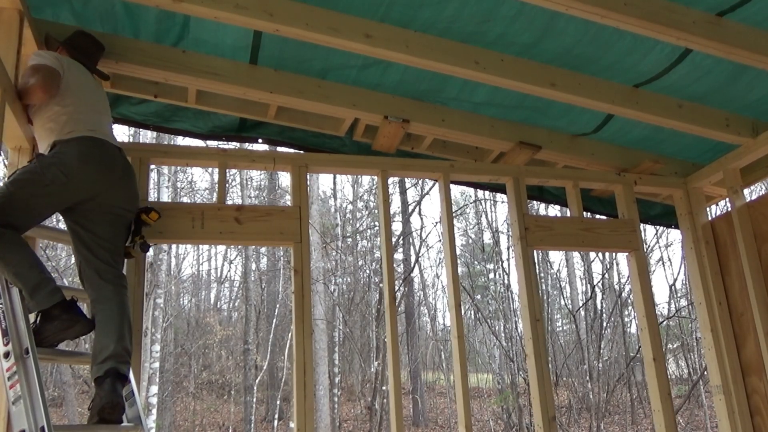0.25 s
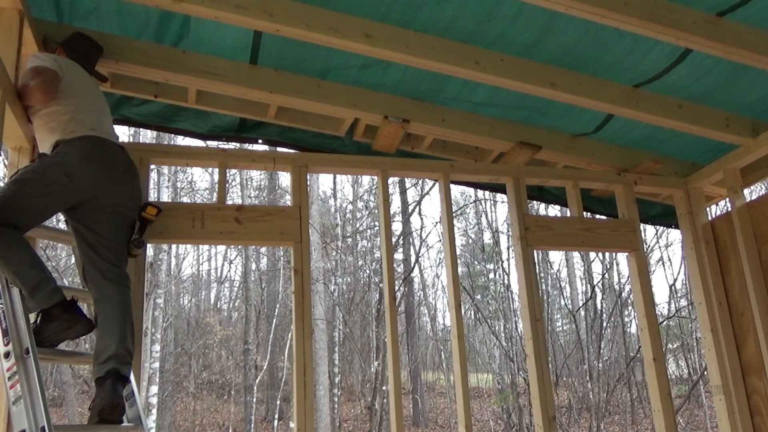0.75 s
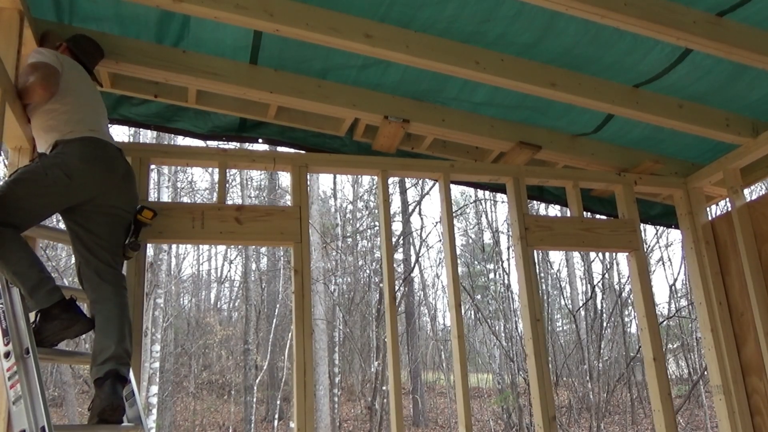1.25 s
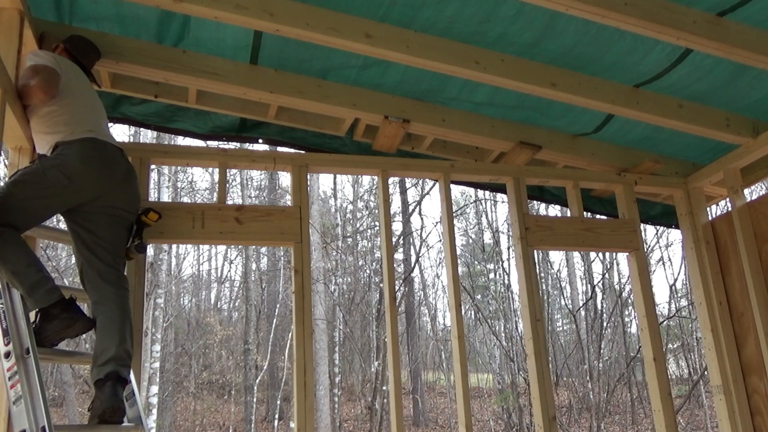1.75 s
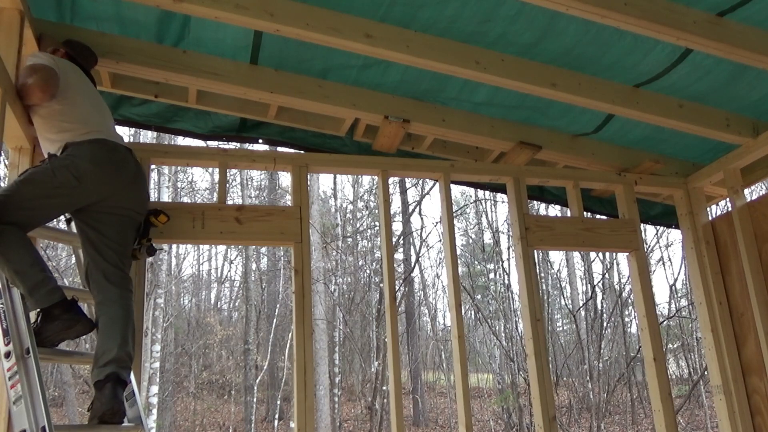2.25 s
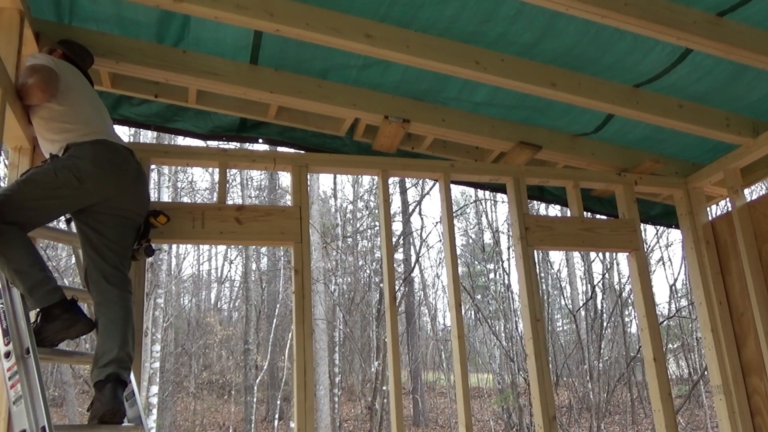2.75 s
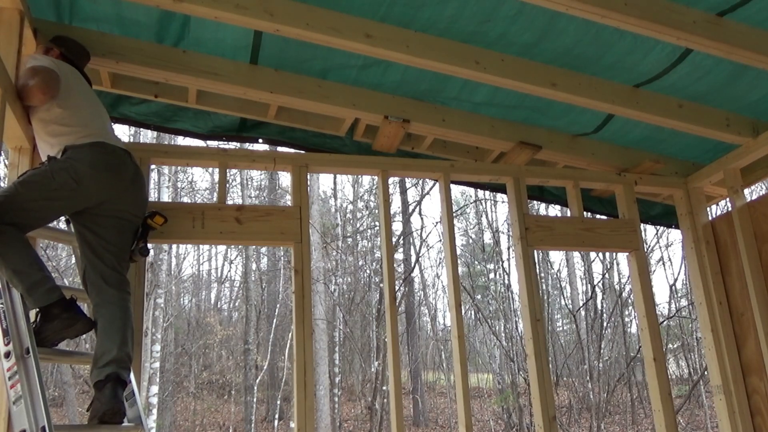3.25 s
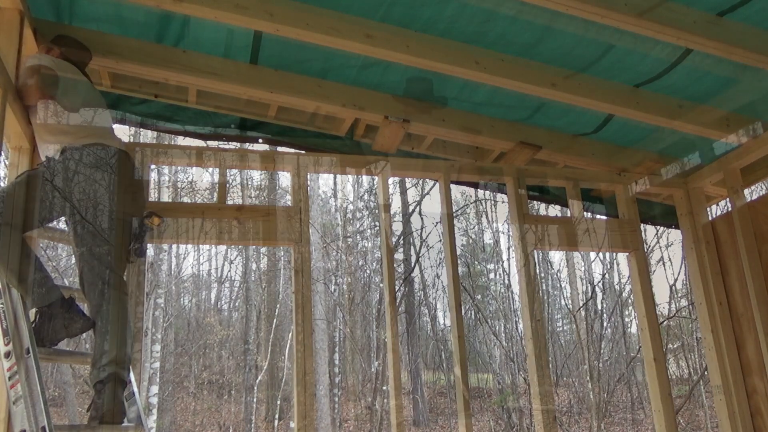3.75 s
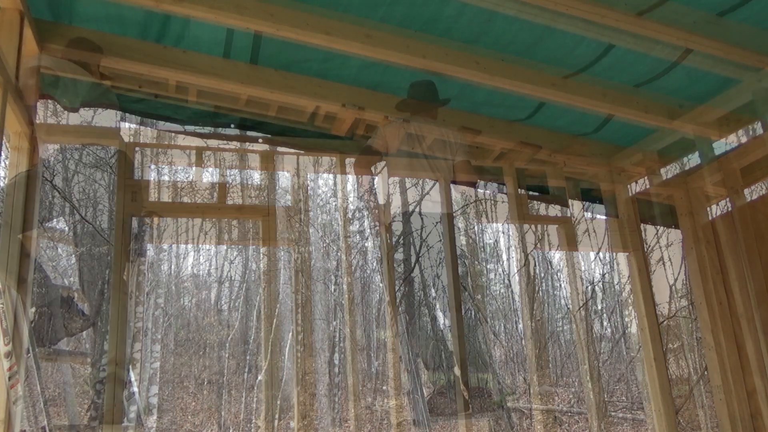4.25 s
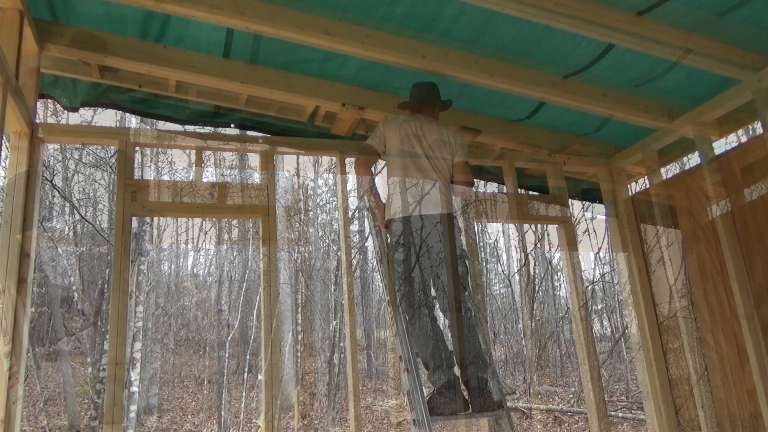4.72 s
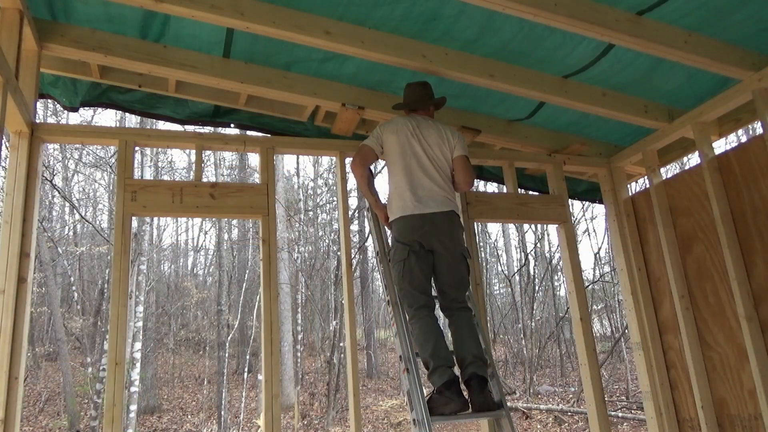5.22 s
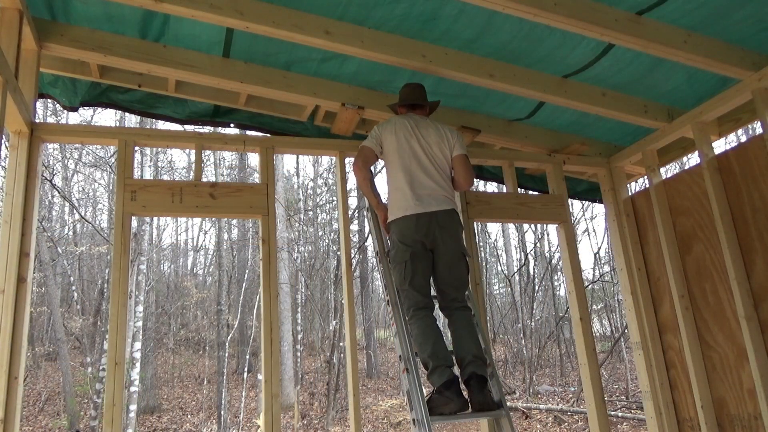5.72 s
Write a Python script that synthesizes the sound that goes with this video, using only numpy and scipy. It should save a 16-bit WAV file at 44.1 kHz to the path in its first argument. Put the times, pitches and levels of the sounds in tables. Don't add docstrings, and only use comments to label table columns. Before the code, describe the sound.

Steady rain patters on a taut tarp overhead while a hand tool rasps wood in five short strokes with knocks, drips snapping nearby.

```python
import sys
import numpy as np
from scipy import signal
from scipy.fft import rfft, irfft
from scipy.io import wavfile
from scipy.ndimage import uniform_filter1d

SR = 44100
rng = np.random.default_rng(int(sys.argv[2]) if len(sys.argv) > 2 else 0)


def undo_db(level):
    steps = np.asarray(level, float) / 20
    return 10 ** steps


def wav_record(signal):
    frames = np.transpose(np.atleast_2d(signal))
    bounded = np.clip(frames, -1, 1)
    quanta = np.round(bounded * 32767).astype(np.int16)
    wavfile.write(sys.argv[1], SR, quanta)


N = 263718

# (time [s], level [dB], extra treble fizz [dB])
RAIN = [(0.0, -40.5, -1.5), (0.28, -40, -2.5), (0.73, -36, -2), (1.06, -40, -3), (2.03, -39, -0.5),
        (2.5, -41, -1), (3.05, -39.5, -1.5), (3.46, -39.5, -4), (3.98, -45.5, 0), (4.76, -47.5, -1),
        (5.61, -46, -1.5), (5.98, -47.5, 0.5)]


def rain():
    s, level_db, fizz_db = np.transpose(RAIN)
    t = np.arange(N) / SR
    strength = undo_db(np.interp(t, s, level_db))
    return strength * patter(), strength * wash(np.interp(t, s, fizz_db))


# (frequency [Hz], level [dB per Hz])
PATTER = [(200, -40), (800, -6), (2000, -17), (5000, -2.5), (8500, -4), (11000, -10.5), (15000, -57)]


def patter():
    level_db, per_s, spread_db = -11.5, 1200, 1.5
    spots = 0
    for side in range(-2, 3):
        spots = spots + placed(clicks(per_s / 5, spread_db), 5.2 * side)
    return undo_db(level_db) * evened(coloured(spots, PATTER))


# (frequency [Hz], level [dB per Hz])
GRIT = [(24, -37), (40, -8), (133, -24.5), (199, -6.5), (392, -6), (479, 0.5), (585, -5.5), (1240, -1.5),
        (2150, -3.5), (3060, -3.5), (9450, -10.5), (13100, -27), (16000, -43)]
# (frequency [Hz], width [Hz], level [dB])
BOARD = [(202, 140, -6), (312, 56, -13.5), (484, 27, -3), (700, 51, 6), (895, 47, 9)]
# (hardest moment [s], push-in [s], let-off [s], pressure [dB], edge brightness [dB])
STROKES = [
    (.685, 0.063, 0.08, -21.5, 4.5),
    (.752, 0.072, 0.048, -28, -1),
    (1.682, 0.048, 0.035, -31.5, -2),
    (1.732, 0.055, 0.079, -25, 3),
    (2.842, 0.035, 0.044, -31, 1),
    (2.879, 0.047, 0.13, -26.5, 4.5),
    (3.39, .015, 0.056, -35.5, -5),
    (3.422, 0.018, 0.1, -29.5, 1.5),
    (4.40, 0.046, 0.068, -34, 1.5),
]


def strokes():
    lift_db, push_curve, letoff_curve = -18, 2.4, 1.45
    dulling = 0.77
    board_db, boom_growth_db = -17, 2
    from_db, to_db = 5, -2

    grit = clicks(20000, 2)
    rasp = clumped(coloured(grit, GRIT), 1)
    dull = signal.lfilter([.35], [1, -.65], rasp)
    boom = evened(sum(undo_db(db) * resonate(grit, hz, width) for hz, width, db in BOARD))
    wobble = evened(uniform_filter1d(rng.standard_normal(N), 150))
    chatter = undo_db(1.05 * wobble)

    out = np.zeros((2, N))
    at = np.arange(-SR // 4, SR // 2)
    for s, push_s, letoff_s, pressure_db, bright_db in STROKES:
        span = at + round(s * SR)
        along = at / SR / np.where(at < 0, push_s, letoff_s)
        curve = np.where(at < 0, push_curve, letoff_curve)
        ease_db = np.maximum(lift_db * abs(along) ** curve, -90)
        travel = np.clip(along, -1, 1)
        edge = undo_db(bright_db + dulling * ease_db) * (rasp[span] - dull[span])
        sound = dull[span] + edge + undo_db(board_db + boom_growth_db * travel) * boom[span]
        pan_db = from_db + (to_db - from_db) * (travel + 1) / 2
        add(out, span[0] / SR, placed(undo_db(pressure_db + ease_db) * chatter[span] * sound, pan_db))
    return out


# (time [s], peak [dB], pitch [Hz])
BUMPS = [(0.663, -28, 448), (0.719, -20, 484), (1.453, -33, 495), (1.705, -44, 479), (1.731, -16, 517),
         (2.057, -34, 476), (2.858, -28, 457), (2.899, -19.5, 448), (3.415, -30.5, 426),
         (3.421, -32.5, 202), (3.441, -24, 490), (4.412, -22, 437), (4.431, -29, 410)]


def bumps():
    out = np.zeros((2, N))
    t = np.arange(SR // 5) / SR
    t60_s, onset_s = 0.042, 0.0034
    for s, peak_db, hz in BUMPS:
        modes = 0
        for ratio, share in [(.62, 0.23), (1, 0.98), (1.7, 0.52)]:
            modes = modes + share * np.sin(2 * np.pi * ratio * hz * t)
        envelope = undo_db(peak_db - 60 * t / t60_s) * (1 - np.exp(-t / onset_s))
        add(out, s, placed(envelope * modes, 0))
    return out


# (time [s], peak
# [dB], centre [Hz], left minus right [dB], splash [dB])
DRIPS = [(0.386, -28.5, 9500, 8, -15), (.445, -42, 10500, 0, -1), (1.07, -39, 6040, 0, -9),
         (1.2558, -36, 5430, -4, -8), (2.054, -39.5, 3000, 2, -0.5), (2.135, -30, 6950, 5, -10),
         (2.1353, -35, 11500, .6, -14), (2.1735, -33, 6300, 6, -7), (2.177, -36, 3000, 2, -4),
         (2.1845, -24.5, 5240, -4, -13), (2.634, -37, 11000, -1, -8), (3.196, -46, 11000, 7, -6),
         (3.721, -41, 9500, -.6, -3), (3.812, -45, 9000, 0, 2), (3.899, -36.5, 8200, -1, -2.5),
         (3.897, -33, 13900, -1, -4), (3.601, -45, 1800, -2, -3), (3.712, -44, 1600, 0, -3),
         (3.792, -36.5, 1500, 2, -9), (3.929, -42, 10500, -2, -2), (5.39, -42, 6000, 0, -11),
         (5.7703, -34, 13500, -1, -10), (5.7712, -41, 5500, -1, -5), (5.972, -45, 7500, 1, 0.5)]


def drips():
    out = np.zeros((2, N))
    t = np.arange(SR // 5) / SR
    off_axis = signal.butter(3, 11000, fs=SR, output="sos")
    for s, peak_db, hz, pan_db, splash_db in DRIPS:
        swell = hz * t / 1.6
        snap = np.sin(2 * np.pi * hz * t) * swell ** 2 * np.exp(2 - 2 * swell)
        spray = resonate(rng.standard_normal(len(t)), hz, 0.87 * hz)
        spray = evened(resonate(spray, hz, 0.87 * hz))
        spray = signal.sosfilt(off_axis, spray) * (1 - np.exp(-t / 0.00032))
        t60_s = 0.1 + 130 / hz
        splash = undo_db(splash_db - 60 * t / t60_s) * spray
        add(out, s, placed(undo_db(peak_db) * (snap + splash), pan_db))
    return out


# (time [s], length [s], level [dB], start [Hz], end [Hz])
BIRD = [
    (4.984, 0.042, -56, 9300, 8450),
    (5.022, .034, -58, 8200, 8700),
    (5.058, .04, -63, 8800, 8300),
]


def bird():
    out = np.zeros((2, N))
    dip_hz = 8050
    for s, length, level_db, start_hz, end_hz in BIRD:
        u = np.arange(round(length * SR)) / (length * SR)
        bend = ((u - .6) / np.where(u < .6, .6, .4)) ** 2
        hz = dip_hz + np.where(u < .6, start_hz - dip_hz, end_hz - dip_hz) * bend
        tone = np.sin(2 * np.pi * np.cumsum(hz) / SR) * np.sqrt(2)
        add(out, s, placed(undo_db(level_db) * tone * signal.windows.tukey(len(u), .6), 0))
    return out


# (frequency [Hz], time to fall 60 dB [s])
FRAME = [(100, 0.13), (500, 0.11), (3000, 0.15), (12000, 0.18)]


def framing(x):
    taps = np.zeros((2, SR // 2))
    at = np.arange(100, SR // 2 - 20, 20) + rng.integers(0, 20, (2, (SR // 2 - 101) // 20))
    np.put_along_axis(taps, at, rng.choice([-1., 1.], at.shape), 1)
    hz, t, z = signal.stft(taps, SR, nperseg=256)
    decay = undo_db(-60 * t / read(FRAME, hz)[:, None])
    tail = signal.istft(z * decay, SR, nperseg=256)[1]
    return undo_db(-7) * signal.fftconvolve(x, tail / np.linalg.norm(tail[0]), axes=1)[:, :N]


# (frequency [Hz], level [dB per Hz])
WASH = [(18, -76), (30, -48), (53, -37), (90, -22.5), (157, -22.5), (210, -16), (486, -5.5), (616, -3.5),
        (780, -1.5), (889, -2.5), (1590, -2), (3060, -4.5), (7270, -13), (8520, -11), (16000, -31.5)]
# (frequency [Hz], correlation [-1..1])
SAME = [(60, 0.99), (150, 0.29), (380, 0.84), (950, 0.81), (2380, 0.74), (5980, 0.86), (15000, 0.96)]
# (frequency [Hz], left minus right [dB])
LEAN = [(60, -2), (180, 6), (550, -1.5), (1650, -2), (4970, -1.0), (15000, 0.5)]


def wash(fizz_db):
    frames, hz = N // 128 + 5, np.fft.rfftfreq(512, 1 / SR)
    a, b, c, d, patches = rng.standard_normal((frames, 257, 5)).T
    patches = evened(uniform_filter1d(uniform_filter1d(patches, 8, 0), 24, 1))
    flicker = evened(uniform_filter1d(rng.standard_normal(frames), 6))
    same = np.clip(read(SAME, hz), -1, 1)[:, None]
    left = a + 1j * b
    right = same * left + np.sqrt(1 - same ** 2) * (c + 1j * d)
    z = np.array([left, right])
    z *= undo_db(read(LEAN, hz) * np.array([[.5], [-.5]]))[..., None]
    fizz = np.interp(np.arange(frames) * 128, np.arange(N), fizz_db)
    fizz = fizz * np.clip(hz / 9000, 0, 1)[:, None]
    z *= undo_db(0.96 * patches + 0.37 * flicker + fizz)
    sound = signal.istft(z, nperseg=512, noverlap=384)[1][:, :N]
    return evened(coloured(sound, WASH))


def rumble():
    band = signal.butter(2, [35, 75], "band", fs=SR, output="sos")
    return undo_db(-105) * evened(signal.sosfilt(band, rng.standard_normal(N)))


def evened(x):
    return x / np.sqrt(np.mean(x ** 2) + 1e-20)


def read(points, hz):
    f, value = np.transpose(points)
    return np.interp(np.log(hz + 1), np.log(f + 1), value)


def add(mix, s, sound):
    part = mix[..., round(s * SR):][..., :sound.shape[-1]]
    part += sound[..., :part.shape[-1]]


def coloured(x, points):
    gain_db = np.maximum(read(points, abs(np.fft.fftfreq(8192, 1 / SR))), -100)
    minimum_phase = np.exp(np.conj(signal.hilbert(np.log(undo_db(gain_db)))))
    taps = np.fft.ifft(minimum_phase).real[:4096]
    taps = taps.reshape((1,) * (x.ndim - 1) + (-1,))
    return signal.oaconvolve(x, taps, axes=-1)[..., :x.shape[-1]]


def resonate(x, hz, width):
    pole = np.exp(-np.pi * width / SR)
    return 2 * signal.lfilter([1 - pole], [1, -pole * np.exp(2j * np.pi * hz / SR)], x).real


def clicks(per_s, spread_db):
    chance, size, sign = rng.random((N, 3)).T
    height = undo_db(spread_db * np.minimum(-np.log(size + 1e-9), 4))
    return (chance < per_s / SR) * height * np.sign(sign - .5)


def clumped(x, depth_db):
    z = signal.stft(x, nperseg=256)[2]
    patches = rng.standard_normal(z.shape[::-1])
    patches = evened(uniform_filter1d(uniform_filter1d(patches, 3, 0), 8, 1)).T
    return evened(signal.istft(z * undo_db(depth_db * patches), nperseg=256)[1][:N])


def placed(x, pan_db):
    return x * undo_db(np.array([pan_db / 2, -pan_db / 2]).reshape(2, -1))


def scene():
    near_rain, far_rain = rain()
    near = near_rain + strokes() + bumps() + drips() + bird()
    low_cut = signal.butter(2, 166, "high", fs=SR, output="sos")
    near = signal.sosfilt(low_cut, near)
    return near + framing(near) + far_rain + rumble()


def top_cut(x):
    return signal.sosfilt(signal.butter(12, 15730, fs=SR, output="sos"), x)


# (frequency [Hz], side against mid [dB])
WIDTH = [(60, -38), (250, -13), (600, -5), (3000, 0), (9000, -1), (11000, -11), (15000, -3)]


def record(dry):
    mid, side = (dry[0] + dry[1]) / 2, (dry[0] - dry[1]) / 2
    mid = mid + undo_db(-71.5) * rng.standard_normal(N)
    side = irfft(rfft(side) * undo_db(read(WIDTH, np.fft.rfftfreq(N, 1 / SR))), N)
    mix = np.array([mid + side, mid - side])
    return top_cut(mix)


dry = scene()
out = record(dry)
wav_record(out)
```